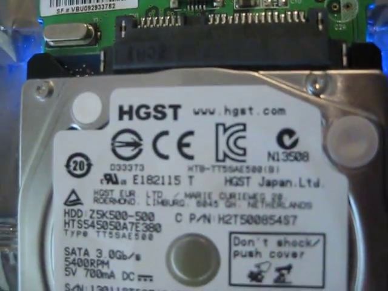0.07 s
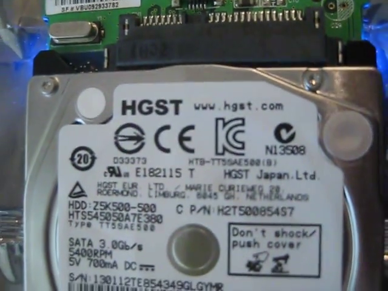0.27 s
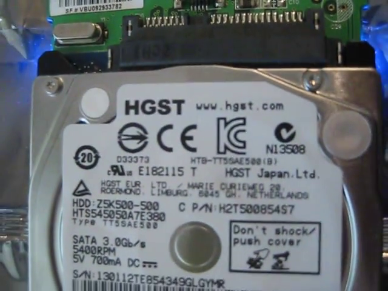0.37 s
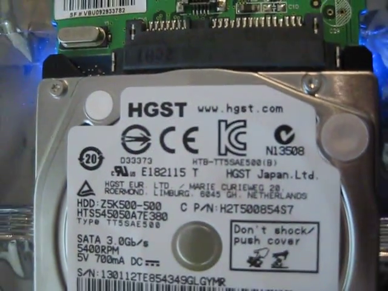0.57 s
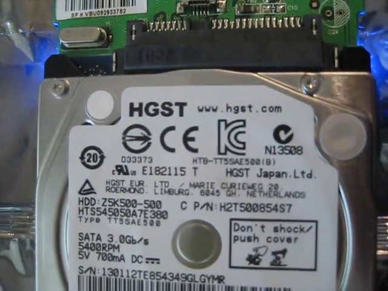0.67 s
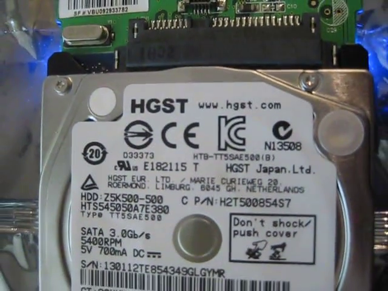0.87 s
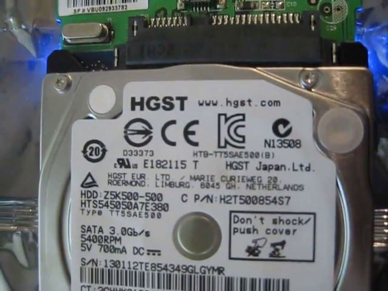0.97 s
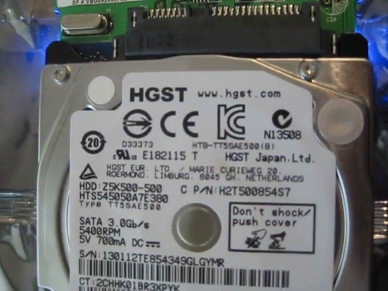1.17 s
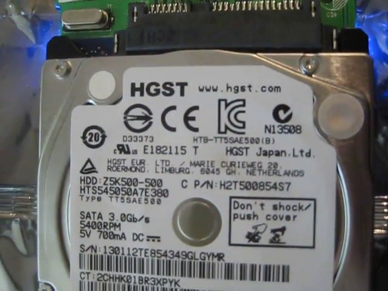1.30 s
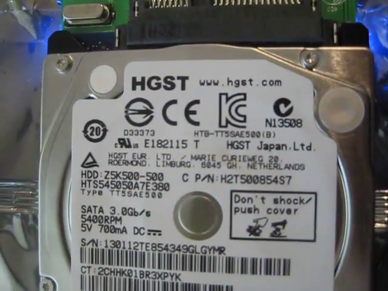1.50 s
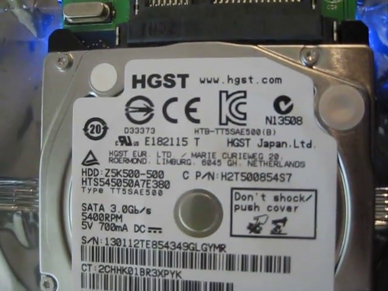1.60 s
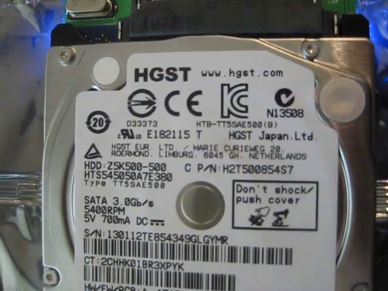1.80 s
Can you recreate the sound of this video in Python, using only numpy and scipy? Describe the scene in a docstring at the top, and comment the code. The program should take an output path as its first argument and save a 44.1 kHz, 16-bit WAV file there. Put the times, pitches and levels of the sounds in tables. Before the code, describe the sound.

A small hard drive whirs steadily up close, with one hard click and a much softer knock.

```python
"""A steady whir of spinning platters and fans runs throughout, with a thin electronic whine and a servo flutter.
A small hard drive runs on a desk, close to the microphone, in a quiet room.
Its head arm chatters faintly as it seeks, and gives one hard click and one softer knock.
Whir, servo and chatter are shaped noise, the whine is wavering sines, the blows are dying case modes."""
import sys
import numpy as np
from scipy import signal
from scipy.fft import rfft, irfft
from scipy.io import wavfile
from scipy.ndimage import uniform_filter1d

SR = 44100
rng = np.random.default_rng(int(sys.argv[2]) if len(sys.argv) > 2 else 0)


def wav_record(signal):
    """Record a signal, one row per channel, as 16-bit PCM in the file named by sys.argv[1]."""
    frames = np.transpose(np.atleast_2d(signal))
    bounded = np.clip(frames, -1, 1)
    # unit amplitude maps onto the largest positive 16-bit level
    quanta = np.round(bounded * 32767).astype(np.int16)
    wavfile.write(sys.argv[1], SR, quanta)


N = 81585  # length in samples

# relative spectrum of the air stirred by platters and fans: pitch_hz [Hz], density_db [dB per Hz]
WHIR_SPECTRUM = [(20, -35), (40, -6), (70, -5), (140, -2.5), (300, -1), (600, -3), (1250, -8), (1750, -8.5),
                 (2400, -12), (3000, -8.5), (3650, -17), (4700, -18), (6000, -22.5), (7200, -24.5),
                 (9000, -22.5), (11000, -28.5), (12500, -29.5), (14500, -28.5), (15700, -30)]
# steady tones of the motor and electronics: pitch_hz [Hz], level_db [dB rms]
WHINE_TONES = [(298, -67), (1535, -66), (1670, -71), (1992, -72), (2160, -70), (6480, -76.5), (8099, -78),
               (9720, -82), (10440, -85), (11880, -84), (12959, -70), (15734, -84)]
# seeks of the head arm: middle_s [s], low_ring_db [dB on ARM_LOW_DB], high_ring_db [dB on ARM_HIGH_DB]
ARM_SEEKS = [(0.057, -1, 0), (0.121, -4, 0.5), (.154, -3.5, -5), (.283, -6, 0), (0.319, -7, 3),
             (0.361, -3, -5), (.393, -6, 2), (.460, -7, -4), (0.492, -2, 0.5), (0.53, 2.5, -5),
             (0.565, -0.5, 0), (.645, 3, -1), (0.677, 2, -1), (.702, 4.5, -0.5), (0.736, -1, -1.5),
             (.814, 4, 1.5), (.846, -2, -3), (0.876, 0.5, 1), (0.904, -3, 0), (0.991, -0.5, -8),
             (1.014, -7, 0), (1.032, 0, -3), (1.063, -1.5, 1), (1.147, -1.5, -2), (1.170, -5, 2),
             (1.21, 0, 0), (1.245, -3, 0.5), (1.311, -4.5, -1), (1.359, -5, 0.5), (1.392, -3, -4.5),
             (1.453, 2, 2), (1.492, -3, 0.5), (1.522, 0, -5), (1.557, -0.5, 0), (1.616, -4, -2),
             (1.654, -3, 2), (1.691, -0.5, 2), (1.724, -1, -2), (1.788, 0, -0.5), (1.842, 2, 3.5)]
# low, then high resonances of the arm in a seek: pitch_hz [Hz], width_hz [Hz], level_db [dB, relative]
ARM_LOW_RESONANCES = [(1990, 79, 7), (2380, 320, -1), (2950, 620, -3.5)]
ARM_HIGH_RESONANCES = [(5430, 400, -5), (5522, 290, -2)]
# blows of the head arm: start_s [s], level_db [dB], hardness [0 a dull knock, 1 a hard snap]
ARM_BLOWS = [(0.2098, -0.2, 0.98), (.9783, -20.5, 0)]
# modes of the case: pitch_hz [Hz], t60_s [s], snap_db [dB, relative], knock_db [dB, relative]
CASE_RING_MODES = [(500, 0.0083, -34, -11), (835, 0.0041, -26, 4.5), (1183, 0.0099, -34, -3.5),
                   (1730, 0.013, -28.5, -26), (2000, 0.0065, -18.5, -19), (2435, 0.0057, -19.4, -25),
                   (3080, 0.0081, -8.5, -4), (3600, .018, -28, -10.5), (3680, 0.004, 5, -9),
                   (4446, 0.0047, -6, -3), (4930, 0.0022, 4, 15), (5560, 0.009, -45, -5.5),
                   (6070, .0018, -2.5, 14.5), (6960, .0078, -37.3, -20.6), (9540, 0.0072, -44, -12.5),
                   (10650, 0.0034, -29.5, -7.4), (14400, .0028, -26, -10.7)]

WHIR_DB, WHIR_PATCH_DB, HISS_TOP_HZ = -46.5, 1.0, 15790
WHINE_WAVER_HZ, WHINE_FLUTTER = 1.5, 0.11  # rms pitch drift; rms level drift as a fraction
SERVO_HZ, SERVO_WIDTH_HZ, SERVO_DB = 5550, 120, -69.5
SERVO_FLUTTER_DB, SERVO_FLUTTER_WIDTH_HZ = 0.5, 70
SEEK_S, ARM_LOW_DB, ARM_HIGH_DB = 0.024, -48.5, -55
LONG_RING_HZ, LONG_RING_DB, LONG_RING_T60_S = 2980, -50, 0.42  # level relative to the blow
SNAP_RISE_S, KNOCK_RISE_S = 0.00027, 0.00052
ROOM_DB, ROOM_T60_S = -32, 0.067
NOTCH_HZ, NOTCH_WIDTH_HZ, EDGE_HZ = 7870, 1900, 16600


def amp(db):
    """Decibels to gain."""
    return 10 ** (np.asarray(db) / 20)


def unit(x):
    """Scales to rms 1."""
    return x / np.sqrt(np.mean(x ** 2) + 1e-20)


def add(mix, start_s, sound):
    """Mixes a sound in at its start time, cut off at the end of the mix."""
    part = mix[max(round(start_s * SR), 0):][:len(sound)]
    part += sound[:len(part)]


def band_noise(hz, width_hz):
    """Noise in one steep-sided resonance, width at -3 dB; at 0 Hz, a slow drift up to half the width."""
    f = np.fft.rfftfreq(N, 1 / SR)
    offset = (f - hz) / width_hz * 2
    response = 1 / (1 + offset ** 4) ** 0.5
    return unit(irfft(rfft(rng.standard_normal(N)) * response, N))


def whir():
    """Air stirred by platters and fans: coloured noise with slight drifting patches in time and pitch."""
    z = signal.stft(rng.standard_normal(N), nperseg=512)[2]
    patches = uniform_filter1d(rng.standard_normal(z.shape), size=9, axis=0)  # across pitch
    patches = unit(uniform_filter1d(patches, size=8, axis=1))  # across time
    air = signal.istft(z * amp(WHIR_PATCH_DB * patches), nperseg=512)[1][:N]

    f = np.fft.rfftfreq(N, 1 / SR)
    hz, db = np.transpose(WHIR_SPECTRUM)
    colour = amp(np.interp(np.log(f + 1), np.log(hz), db))
    colour = colour * (f < HISS_TOP_HZ)
    return amp(WHIR_DB) * unit(irfft(rfft(air, N) * colour, N))


def whine():
    """Thin motor and electronic tones: sines that waver a little in pitch and level."""
    out = np.zeros(N)
    for hz, db in WHINE_TONES:
        pitch_hz = hz + WHINE_WAVER_HZ * band_noise(0, width_hz=13.6)
        turns = np.cumsum(pitch_hz) / SR
        level = 1 + WHINE_FLUTTER * band_noise(0, width_hz=19)
        out += amp(db) * unit(np.sin(2 * np.pi * turns) * level)
    return out


def servo():
    """The servo flutters faintly throughout: a narrow band of noise with an unsteady level."""
    flutter = amp(SERVO_FLUTTER_DB * band_noise(0, SERVO_FLUTTER_WIDTH_HZ))
    return amp(SERVO_DB) * unit(flutter * band_noise(SERVO_HZ, SERVO_WIDTH_HZ))


def arm_ring(resonances, level_db, column):
    """Each swing of the arm stirs one set of its resonances into a short swell of noise."""
    out = np.zeros(N)
    swell = np.hanning(int(SEEK_S * SR))
    swell_rms = np.sqrt(np.mean(swell ** 2))
    ring = sum(amp(db) * band_noise(hz, width) for hz, width, db in resonances)
    ring = np.tile(ring, 2)  # long enough for a swell that overruns the end
    for seek in ARM_SEEKS:
        start_s = seek[0] - SEEK_S / 2
        stretch = ring[round(start_s * SR):][:len(swell)]
        burst = unit(swell * stretch) * swell_rms
        add(out, start_s, amp(level_db + seek[column]) * burst)
    return out


def seeks():
    """The chatter of the arm: low and high rings swell together at each seek, in varying balance."""
    low = arm_ring(ARM_LOW_RESONANCES, ARM_LOW_DB, column=1)
    high = arm_ring(ARM_HIGH_RESONANCES, ARM_HIGH_DB, column=2)
    return low + high


def dying_partial(t, hz, t60_s):
    """One mode after a blow: a sine that falls 60 dB in t60_s."""
    return np.exp(-np.log(1000) * t / t60_s) * np.sin(2 * np.pi * hz * t)


def clicks():
    """Each blow of the arm rings the case for milliseconds, by its hardness; a faint, long ring near 3 kHz
    lingers on."""
    out = np.zeros(N)
    t = np.arange(SR // 2) / SR
    for start_s, level_db, hardness in ARM_BLOWS:
        ring = amp(LONG_RING_DB) * dying_partial(t, LONG_RING_HZ, LONG_RING_T60_S)
        for hz, t60_s, snap_db, knock_db in CASE_RING_MODES:
            mode_db = knock_db + hardness * (snap_db - knock_db)
            ring += amp(mode_db) * dying_partial(t, hz, t60_s)
        rise_s = KNOCK_RISE_S + hardness * (SNAP_RISE_S - KNOCK_RISE_S)
        onset = 1 - np.exp(-(t / rise_s) ** 2)
        add(out, start_s, -amp(level_db) * ring * onset)
    return out


def room(x):
    """A faint, short tail from the room: decaying noise that begins 3 ms after the direct sound."""
    t = np.arange(SR // 3) / SR
    decay = np.exp(-np.log(1000) * t / ROOM_T60_S)
    tail = rng.standard_normal(len(t)) * decay * (t > 0.003)
    tail = tail / np.linalg.norm(tail)
    return amp(ROOM_DB) * signal.fftconvolve(x, tail)[:N]


def scene():
    """The running drive up close, with the arm's blows also heard in the room."""
    running = whir() + whine() + servo() + seeks()
    blows = clicks()
    return (running + blows + room(blows))[None]


def record(dry):
    """The microphone has a deep notch in the treble; then a steep band limit cuts the top."""
    b, a = signal.iirnotch(NOTCH_HZ, NOTCH_HZ / NOTCH_WIDTH_HZ, SR)
    notched = signal.lfilter(b, a, dry)
    band_limit = signal.firwin(511, EDGE_HZ, window=("kaiser", 9), fs=SR)
    return signal.oaconvolve(notched, band_limit[None], "same")


dry = scene()
out = record(dry)
wav_record(out)
```